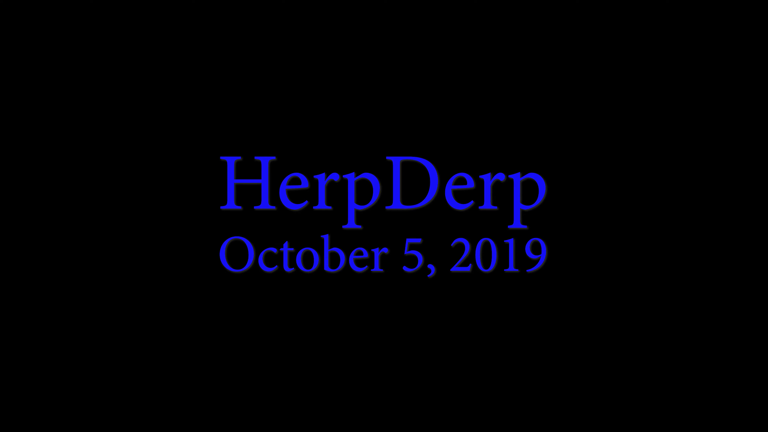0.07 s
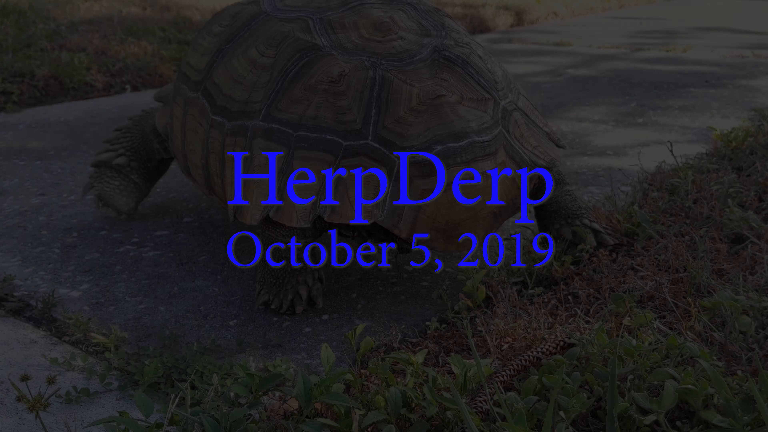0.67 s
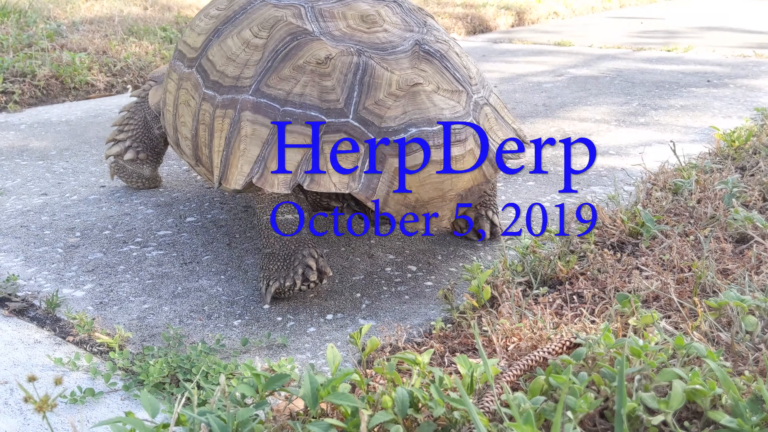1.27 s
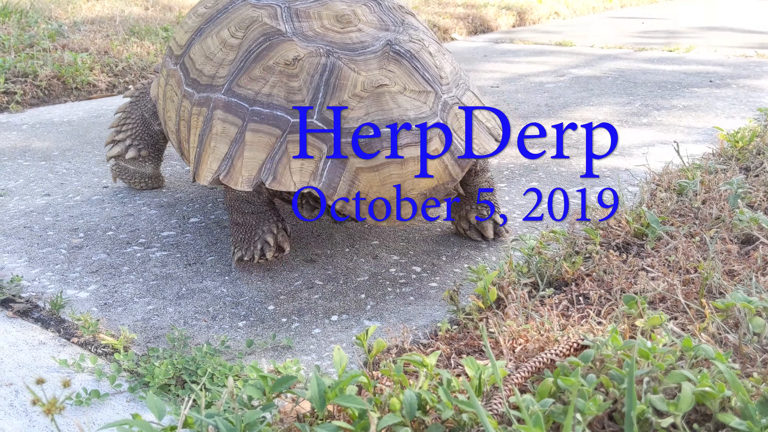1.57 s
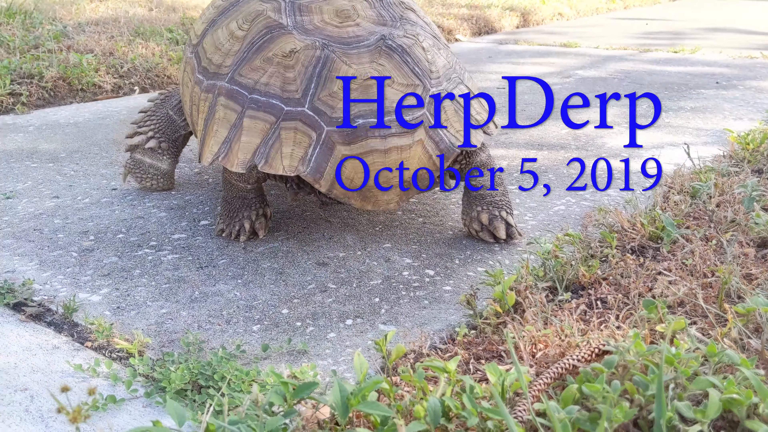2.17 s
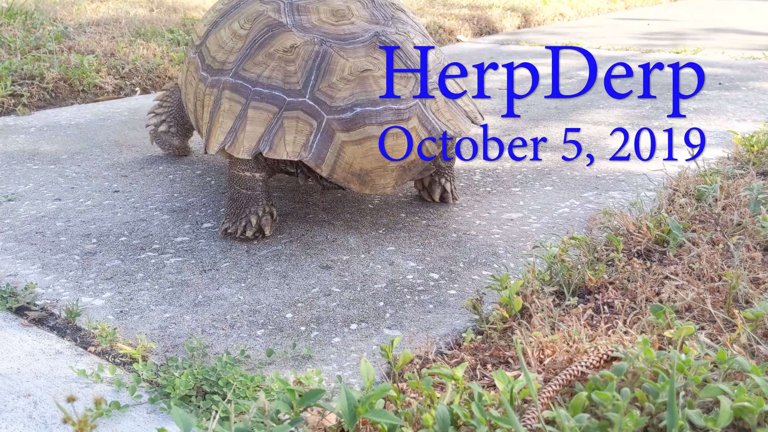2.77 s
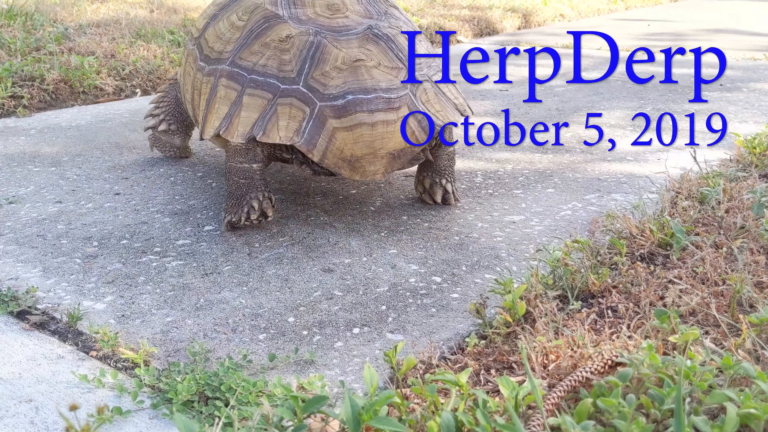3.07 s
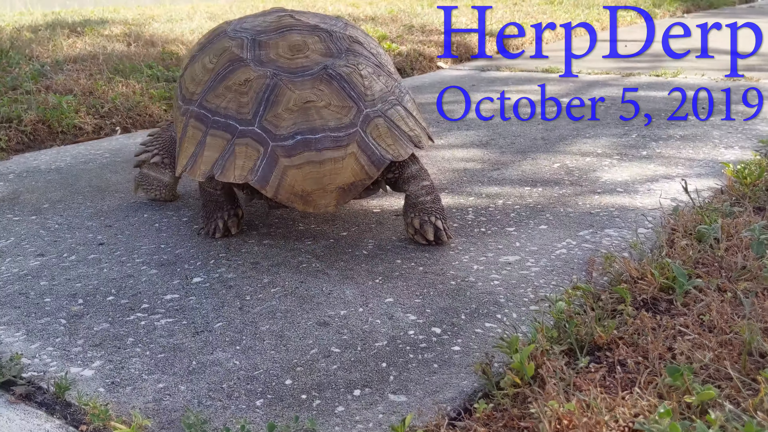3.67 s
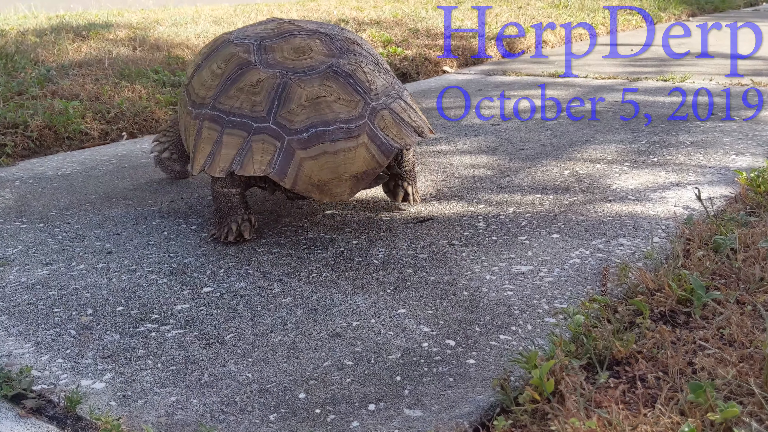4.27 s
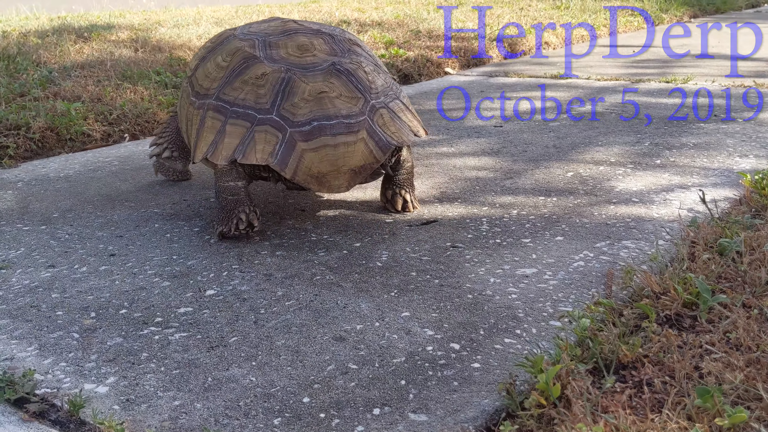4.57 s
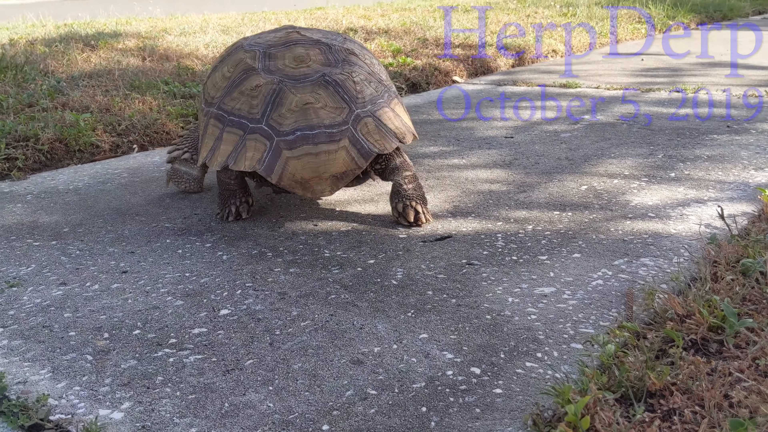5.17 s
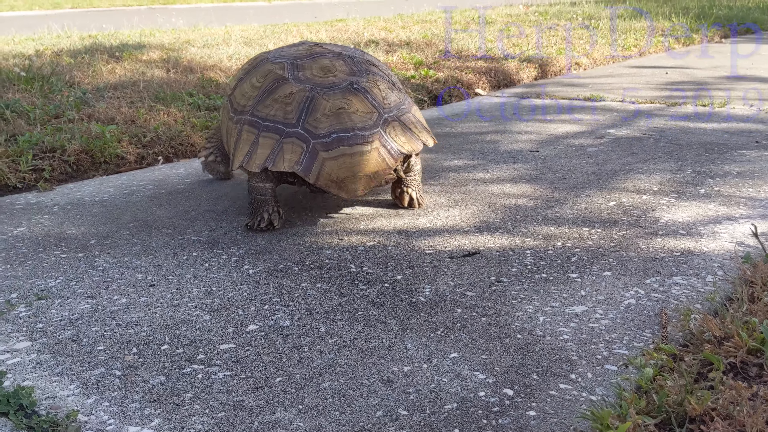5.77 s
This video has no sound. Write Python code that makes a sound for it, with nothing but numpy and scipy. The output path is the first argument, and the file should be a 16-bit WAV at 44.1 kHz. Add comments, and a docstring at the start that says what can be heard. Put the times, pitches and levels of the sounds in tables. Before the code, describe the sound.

Light, uneven claw taps and gritty foot drags of a tortoise walking on concrete, with soft wind, far engine hum and faint chirps.

```python
"""A tortoise on a concrete path

A large tortoise plods along: its claws tick on the slab, its scaly feet drag over grit,
and sand crackles under each step. Around it are a low outdoor rumble, light wind, distant
engine hum, a far bird and two insects that fall silent. The whole sound fades in at the start."""
import sys
import numpy as np
from scipy import signal
from scipy.fft import rfft, irfft, next_fast_len
from scipy.io import wavfile
from scipy.ndimage import map_coordinates

SR = 44100
rng = np.random.default_rng(int(sys.argv[2]) if len(sys.argv) > 2 else 0)


def store_wav(level_fs):
    """Save 16-bit WAV to argv[1]."""
    pcm = np.round(np.clip(np.atleast_2d(level_fs), -1, 1) * 32767)
    wavfile.write(sys.argv[1], SR, pcm.T.astype(np.int16))


N = 266364
TOP_HZ = 15880  # nothing is heard above this pitch

# Claws landing. Levels are relative; body is the low part of a tick, brightness the high part.
# Columns: start_s, level_db, body_db, brightness_db, claw_count
CLAW_CONTACTS = [(0.6749, -48, -4, -20, 1), (0.7198, -40.5, -11, -13, 2), (1.0718, -43.5, -19, -34, 1),
                 (1.1708, -34.5, -30, -12.5, 1), (1.5484, -32, -30, -19, 1), (1.584, -37.5, -22, -22, 1),
                 (1.7055, -43.5, -20, -12, 1), (2.0512, -46, -18, -21, 1), (2.083, -36.5, -18, -23, 1),
                 (2.4825, -41, -18, -30, 1), (2.6837, -43, -20, -21, 1), (2.9444, -44, -19, -12, 2),
                 (2.9791, -46, -20, -7, 1), (3.062, -50, -25, -17, 1), (3.079, -36.5, -38, -14, 1),
                 (3.2161, -41.5, -12, -8, 1), (3.2768, -46, -12, -17, 1), (3.7293, -46.5, -16, -34, 1),
                 (3.8276, -39, -16, -9.5, 1), (3.894, -39.5, -20, -18, 1), (3.928, -44, -17, -19, 2),
                 (4.1013, -36, -11, -25, 1), (4.1728, -41.5, -16, -24, 2), (4.465, -46, -20, -7.5, 1),
                 (4.482, -41.5, -17, -8, 1), (4.561, -41, -18, -4, 1), (4.591, -39, -21, 2, 1),
                 (4.606, -28.5, -33, -5.5, 1), (4.6588, -45.5, -23, -13.5, 1), (4.7547, -35, -23, -12, 1),
                 (4.8004, -45, -21, -21, 1), (4.8392, -44, -8, -24, 1), (5.031, -45, -24, -1, 1),
                 (5.536, -41.5, -21, -24, 2), (5.5564, -44, -13, -17, 1), (5.6317, -43, -26, -9, 1),
                 (5.8212, -45.5, -14, -4, 1), (5.9008, -42, -11, -19, 2), (5.952, -45, -25, -21, 1)]
# The tone of a claw tick. Columns: pitch_hz, level_db
CLAW_TONE = [(700, -18), (2000, -7), (3000, -6.5), (4000, -1.5), (4800, -7.5), (5900, -3.5), (7500, -7.5),
             (8600, -12), (9700, -5.5), (13000, -8), (15000, -3.5), (18500, -16)]


def claw_ticks(boost_db=9.5, crack_decay_s=0.0035, next_claw_s=0.0095, next_claw_db=-1.5):
    """A claw snaps off a sand grain: a tiny crack, duller or brighter by the grain's size."""
    out = np.zeros((2, N))
    t = np.arange(SR // 50) / SR
    decay = amp(-60 * t / crack_decay_s)
    for start_s, level_db, body_db, brightness_db, claw_count in CLAW_CONTACTS:
        tilt = [(3800, 0.81 * (body_db + 10)), (5500, 0), (8000, 0), (12500, 1.2 * (brightness_db + 10))]
        for claw in range(round(claw_count)):  # a second claw lands later and softer
            crack = slab_echoes(rng.standard_normal((2, len(t))) * decay)
            tick = sharp_filter(crack, lambda hz: along(CLAW_TONE, hz) + along(tilt, hz))
            tick /= np.linalg.norm(tick, axis=1, keepdims=True)
            gain = amp(level_db + boost_db + claw * next_claw_db)
            add(out, start_s + 0.00071 + claw * next_claw_s, gain * tick)
    return out * panned(left_db=3)


# Feet dragging; more tilt sounds brighter. Columns: start_s, length_s, level_db, tilt_db_per_octave
FOOT_DRAGS = [(0.713, 0.024, -54.5, 2), (0.924, 0.081, -68.5, 19), (1.511, 0.03, -47, 3.5),
              (1.536, 0.04, -51, 4), (2.947, .016, -58.5, 11), (3.205, 0.019, -61.5, -9),
              (3.264, 0.034, -58.5, 1.5), (4.554, 0.016, -63, 12), (4.581, .028, -59.5, 12),
              (4.744, 0.031, -53.5, 6.5), (4.777, 0.033, -57.5, 1.5), (5.533, 0.045, -61.5, -3.5)]
# The tone of a foot rubbing on concrete. Columns: pitch_hz, level_db
RUB_TONE = [(700, -38), (1400, -22), (2000, -7), (3100, -7.5), (4900, -7), (5700, 1.5), (6800, -10),
            (7500, -3), (8500, -13), (9700, -7.5), (11000, -22.5), (12000, -9.5), (13200, -26),
            (15500, -19)]


def foot_drags(slips_per_s=4500, spread_db=4.0, edge_s=0.0076):
    """Scales skid over the rough slab: a dense, uneven run of tiny slips."""
    out = np.zeros((2, N))
    octaves = lambda hz: np.log2(np.clip(hz, 1000, TOP_HZ) / 6000)
    for start_s, length_s, level_db, tilt in FOOT_DRAGS:
        t = np.arange(int((length_s + 2 * edge_s) * SR)) / SR
        slips = (rng.random(len(t)) < slips_per_s / SR) * amp(spread_db * rng.standard_normal(len(t)))
        pressure = np.clip(np.minimum(t, t[-1] - t) / (2 * edge_s), 0, 1)
        rub = slab_echoes(slips * rng.standard_normal((2, len(t))))
        rub = filtered(rub, lambda hz: amp(along(RUB_TONE, hz) + tilt * octaves(hz)) * (hz < TOP_HZ))
        add(out, start_s - edge_s, amp(level_db) * pressure * unit(rub))
    return out * panned(left_db=2)


# The tone of cracking sand. Columns: pitch_hz, level_db
SAND_TONE = [(1500, -18), (3500, -5.5), (5900, 3.5), (8500, -0.5), (9700, 2.5), (10800, -3.5), (11900, 6),
             (13000, -8), (15000, -4.5)]


def sand_crackle(rest_db=-80, pressed_db=-77, shift_s=0.06, grains_per_s=70, crack_decay_s=0.0061):
    """Sand grains crackle faintly under the shifting weight, most around each claw contact."""
    weight = np.sqrt(sum(swell(start_s, shift_s) for start_s, *_ in CLAW_CONTACTS))
    grain_size = amp(4.5 * np.clip(rng.standard_normal(N), -2, 2))
    pops = (rng.random(N) < grains_per_s / SR) * grain_size
    decay = amp(-60 * np.arange(SR // 100) / SR / crack_decay_s)
    bursts = signal.fftconvolve(pops, decay)[:N]
    crackle = slab_echoes(bursts * rng.standard_normal((2, N)))
    crackle = filtered(crackle, lambda hz: amp(along(SAND_TONE, hz)) * (hz < TOP_HZ))
    return np.hypot(amp(rest_db), amp(pressed_db) * weight) * unit(crackle) * panned(left_db=1.1)


# Quick echoes off the slab and nearby edges. Columns: delay_s, level_db
SLAB_ECHOES = [(.0007, -4), (.0017, -11.5), (.0024, -8), (.0033, -5.5), (.0043, -11)]


def slab_echoes(sound, scatter=0.12):
    """Sound bounces off close surfaces and reaches each ear at a slightly different time."""
    out = sound.copy()
    for delay_s, level_db in SLAB_ECHOES:
        for side in (0, 1):
            add(out[side], delay_s * np.exp(scatter * rng.standard_normal()), amp(level_db) * sound[side])
    return out


# A bird's whistles; loudest_fraction runs from 0 (the start) to 1 (the end).
# Columns: start_s, length_s, top_hz, last_hz, level_db, loudest_fraction
BIRD_WHISTLES = [(0.87, .25, 3240, 3030, -79, .4), (1.222, 0.31, 3630, 2890, -72.5, .75),
                 (3.09, .17, 3370, 3090, -69, 0.9), (4.07, 0.4, 3390, 2980, -76, 0.75),
                 (4.785, .225, 3600, 3120, -69, 0.2), (5.781, .19, 3690, 3470, -72.5, .55)]


def far_bird(gain_db=-2, scoop_s=0.04, scoop_hz=377.5, flutter_db=5, echo_decay_s=0.48, echo_db=-2):
    """Far whistles scoop up, then sag ever faster; trees and walls smear them with echoes."""
    song = np.zeros(N)
    quaver, flutter = wobble(120), wobble(60)
    for start_s, length_s, top_hz, last_hz, level_db, loudest in BIRD_WHISTLES:
        progress = np.linspace(0, 1, int(length_s * SR))
        scoop = scoop_hz * np.clip(1 - progress * length_s / scoop_s, 0, 1)
        sag = (top_hz - last_hz) * progress ** 2.1
        waver = 1 + 0.0046 * np.roll(quaver, -int(start_s * SR))[:len(progress)]
        effort = np.sqrt(2) * np.interp(progress, [0, np.clip(loudest, 0.1, 0.9), 1], [0, 1, 0])
        add(song, start_s, amp(level_db + gain_db) * effort * sine((top_hz - scoop - sag) * waver))
    song *= amp(flutter_db * flutter)
    t = np.arange(SR // 2) / SR
    tail = rng.standard_normal((2, len(t))) * amp(-60 * t / echo_decay_s)
    echo = signal.fftconvolve(song[None], tail / np.linalg.norm(tail[0]), axes=1)[:, :N]
    return song + amp(echo_db) * echo


# The tone of an insect's rasping wing. Columns: pitch_hz, level_db
WING_TONE = [(3000, -25), (4200, -1), (5000, -5), (5800, 8.5), (6220, 1.5), (6700, 2), (7600, 4),
             (9000, -18), (14000, -33)]


def near_insect(ring_db=-74, rasp_db=-71, wing_hz=6200, drift_hz=9, flutter_db=2, stop_s=2.705):
    """A thin, steady trill in the grass: the wing rings over a soft rasp, then stops at once."""
    singing = np.clip((stop_s - seconds()) / 0.027, 0, 1)
    ring = sine(wing_hz + drift_hz * wobble(50))
    ring = unit(ring * amp(flutter_db * wobble(70)))
    return singing * (amp(ring_db) * ring * panned(left_db=1) + amp(rasp_db) * wide_noise(WING_TONE))


def far_insect(level_db=-74, pitch_hz=4280, width_hz=340, flutter_db=2):
    """A second, more distant insect swells once: a narrow band of fluttering noise."""
    band = filtered(rng.standard_normal((2, N)), lambda hz: np.exp(-((hz - pitch_hz) / width_hz) ** 2))
    trill = unit(band * amp(flutter_db * wobble(40)))
    return amp(level_db) * swell(peak_s=2.42, half_width_s=0.34) * trill


# Moments when the engine hum grows louder. Columns: peak_s, half_width_s, rise_db
ENGINE_SWELLS = [(1.82, 0.089, 9.5), (2.36, 0.21, 11), (4.68, 0.24, 9), (5.65, 0.47, 9.5)]


def engine_hum(base_db=-62, start_hz=140.9, idle_hz=135.1, settle_s=3.0, unsteady_db=0.5):
    """A distant engine slows to an idle; its hum swells and wavers on its way through the air."""
    pitch_hz = np.interp(seconds(), [0, settle_s], [start_hz, idle_hz])
    swell_db = sum(rise_db * swell(peak_s, width) for peak_s, width, rise_db in ENGINE_SWELLS)
    gain = amp(base_db + swell_db + unsteady_db * wobble(6.3))
    return gain * unit(sine(pitch_hz + wobble(8))) * panned(left_db=2.1)


def machine_drone(start_db=-67.5, sink_db_per_s=2.5, pitch_hz=329, drift_hz=2, unsteady_db=4):
    """A fainter, higher machine note sinks into the rumble."""
    note = unit(sine(pitch_hz + drift_hz * wobble(8)))
    gain = amp(start_db - sink_db_per_s * seconds() + unsteady_db * wobble(6.13))
    return gain * note * panned(left_db=2.7)


# Gusts of wind. Columns: peak_s, half_width_s, rise_db
WIND_GUSTS = [(2.25, 0.26, 4.5), (2.85, 0.087, 6), (3.55, 0.12, 6)]
# The deep tone of buffeting air. Columns: pitch_hz, level_db
WIND_TONE = [(8, -12), (20, -0.5), (31, 3.5), (50, -6), (80, -8), (200, -57.5)]


def wind(base_db=-53, unsteady_db=0.95, calm_db=-13, rise_s=1.53):
    """A light breeze picks up from calm and buffets the microphone, with a few gusts."""
    breeze_db = base_db + np.interp(seconds(), [0, rise_s], [calm_db, 0])
    gust_db = sum(rise_db * swell(peak_s, width) for peak_s, width, rise_db in WIND_GUSTS)
    return amp(breeze_db + gust_db + unsteady_db * wobble(4.03)) * wide_noise(WIND_TONE)


# The tone of the low rumble nearby. Columns: pitch_hz, level_db
RUMBLE_TONE = [(30, -11), (65, -3), (110, -1), (145, -2), (175, -0.5), (200, -7.5), (235, -4.5), (280, -11),
               (380, -21.5), (700, -44.5)]
# The tone of the soft wash of far-off noise. Columns: pitch_hz, level_db
WASH_TONE = [(150, -15), (300, -2.5), (450, -1.5), (720, -1.5), (1000, -7.5), (1300, -13.5), (1900, -19.5),
             (4000, -33.5)]
# The tone of the fine outdoor hiss. Columns: pitch_hz, level_db
HISS_TONE = [(1000, -5.5), (1950, -3), (2350, 8), (2700, 5), (3200, 7.5), (4800, 1), (5900, 4.5),
             (8500, -8), (9600, 1), (10700, -25), (11900, -4), (13000, -22), (15500, -3.5)]


def outdoors(rumble_db=-49.5, wash_db=-58, hiss_db=-67, ebb_db_per_s=0.2, drift_db=0.75, flutter_db=0.5):
    """The rumble and wash of the neighbourhood ebb slowly under a fine, steady hiss."""
    rumble = amp(rumble_db + drift_db * wobble(3.09)) * wide_noise(RUMBLE_TONE)
    wash = amp(wash_db + flutter_db * wobble(14)) * wide_noise(WASH_TONE)
    hiss = amp(hiss_db) * wide_noise(HISS_TONE)
    return amp(-ebb_db_per_s * seconds()) * (rumble + wash) + hiss


# How alike the two ears hear the background (1 is the same). Columns: pitch_hz, likeness_fraction
EAR_LIKENESS = [(25, 0.97), (60, 0.92), (160, 0.97), (260, 0.8), (500, 0.17), (1000, 0.58), (2000, 0.00071),
                (12000, 0)]
# How much louder the background is on the left. Columns: pitch_hz, left_db
LEFT_LEAN = [(60, 0), (130, 2), (260, 2), (500, 6), (1000, 2.5), (2000, -2), (5000, 1.5), (14000, 0)]


def wide_noise(tone):
    """Noise from all around with the given tone; its bass is nearly the same in both ears."""
    def shape(hz):
        angle = np.arccos(np.clip(along(EAR_LIKENESS, hz), -1, 1)) / 2
        return amp(along(tone, hz)) * [np.cos(angle), np.sin(angle)]

    shared, opposite = filtered(rng.standard_normal((2, N)), shape)
    ears = np.array([shared + opposite, shared - opposite])
    return unit(filtered(ears, lambda hz: panned(along(LEFT_LEAN, hz))))


def amp(db):
    """Turn decibels into a multiplier."""
    return 10 ** (np.asarray(db) / 20)


def unit(x):
    """Scale a sound to an average power of 1."""
    return x / np.sqrt(np.mean(x ** 2) + 1e-20)


def along(points, hz):
    """Read between a table's rows, with pitch spaced in octaves."""
    pitches, values = np.transpose(points)
    return np.interp(np.log(hz + 1), np.log(pitches + 1), values)


def seconds():
    """The time of every sample."""
    return np.arange(N) / SR


def sine(hz):
    """A pure tone that follows a changing pitch."""
    return np.sin(2 * np.pi * np.cumsum(hz) / SR)


def swell(peak_s, half_width_s):
    """A smooth rise to 1 and back."""
    return np.exp(-((seconds() - peak_s) / half_width_s) ** 2)


def wobble(per_s):
    """A smooth curve through this many random points a second."""
    return map_coordinates(rng.standard_normal(int(N * per_s / SR) + 4), [np.arange(N) * per_s / SR])


def filtered(x, gain_at):
    """Turn each pitch in a sound up or down."""
    length = x.shape[-1]
    padded = next_fast_len(length + 2048)
    return irfft(rfft(x, padded) * gain_at(np.fft.rfftfreq(padded, 1 / SR)), padded)[..., :length]


def sharp_filter(x, tone_db, size=1024):
    """Shape a short sound's tone while keeping its start sharp."""
    cepstrum = irfft(np.log(amp(tone_db(np.fft.rfftfreq(size, 1 / SR)))))
    cepstrum *= 1 + np.sign(size // 2 - np.arange(size))  # ring only after the hit
    return irfft(rfft(x, size) * np.exp(rfft(cepstrum)), size)


def add(track, start_s, sound):
    """Mix a sound into the track at the given time."""
    part = track[..., max(round(start_s * SR), 0):][..., :sound.shape[-1]]
    part += sound[..., :part.shape[-1]]


def panned(left_db):
    """Left and right gains, with the left louder by left_db."""
    return amp(np.array([[0.5], [-0.5]]) * left_db)


def scene():
    """The footsteps close by, everything else behind them."""
    tortoise = claw_ticks() + foot_drags() + sand_crackle()
    wildlife = far_bird() + near_insect() + far_insect()
    return tortoise + wildlife + engine_hum() + machine_drone() + wind() + outdoors()


def record(dry, silence_s=0.252, fade_from_s=0.19, fade_s=1.226):
    """The sound opens after a moment of silence and fades in, with its highest treble cut off."""
    opening = np.clip((seconds() - silence_s) / 0.0049, 0, 1)
    fade = np.clip((seconds() - fade_from_s) / fade_s, 0, 1) ** 0.83
    return filtered(dry * opening * fade, lambda hz: hz < TOP_HZ)


dry = scene()
out = record(dry)
store_wav(out)
```